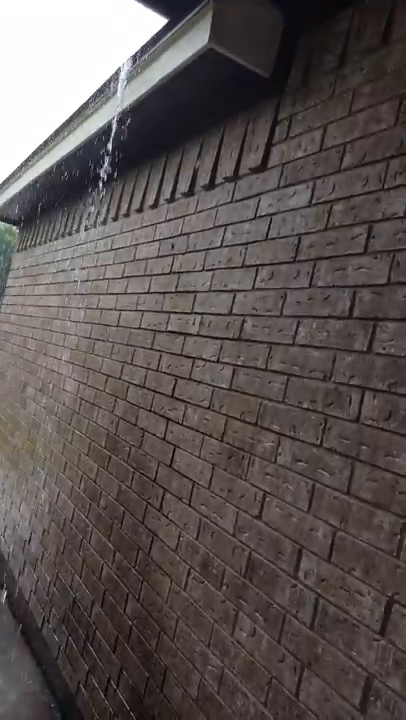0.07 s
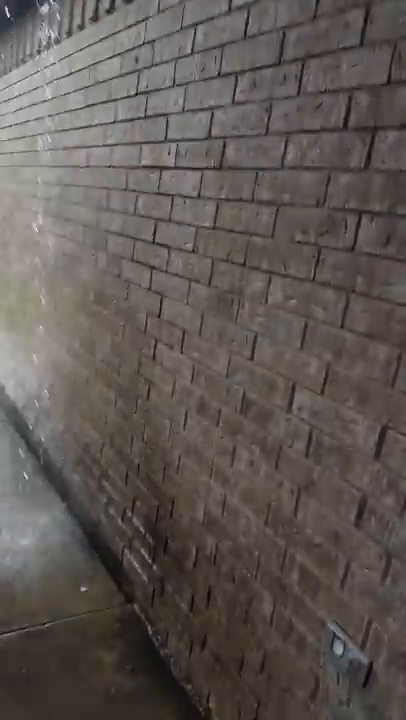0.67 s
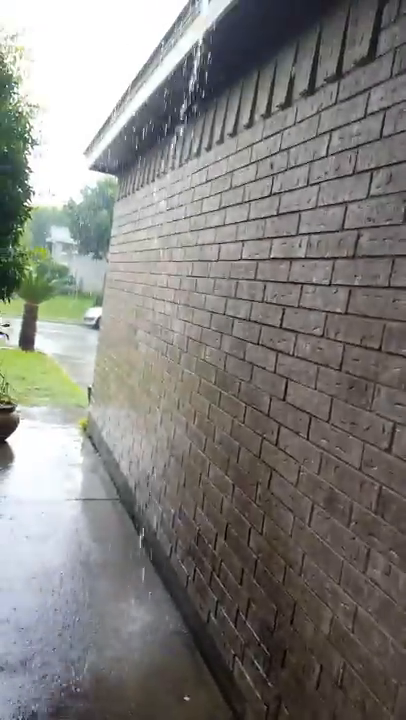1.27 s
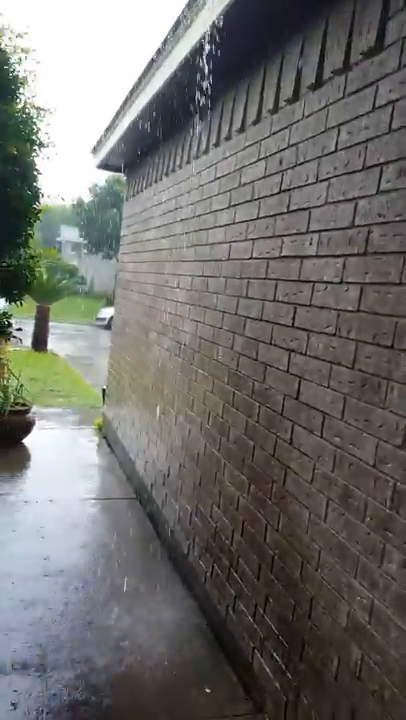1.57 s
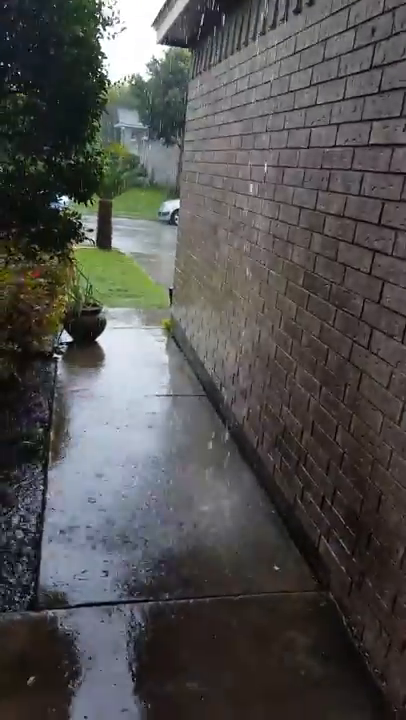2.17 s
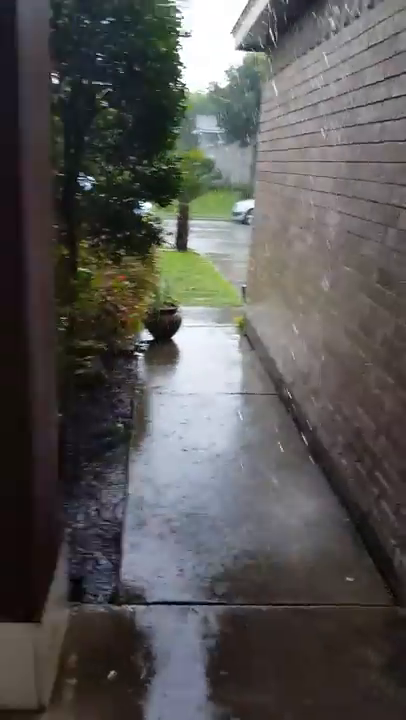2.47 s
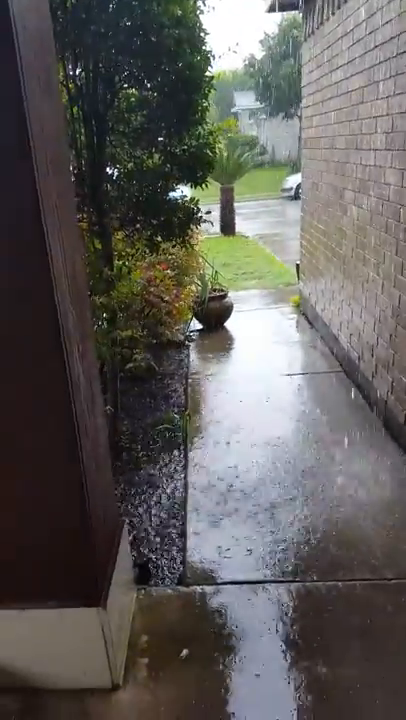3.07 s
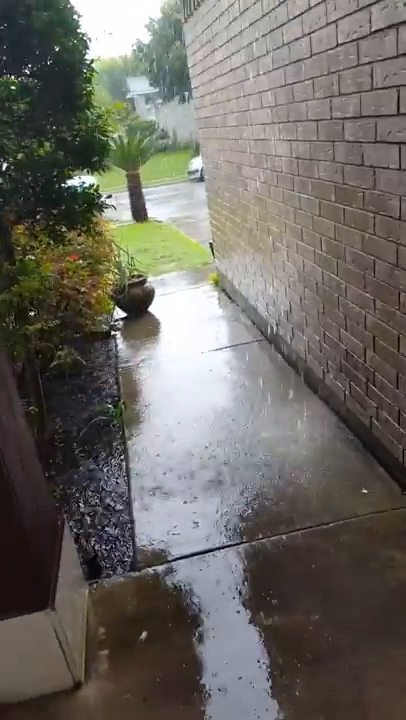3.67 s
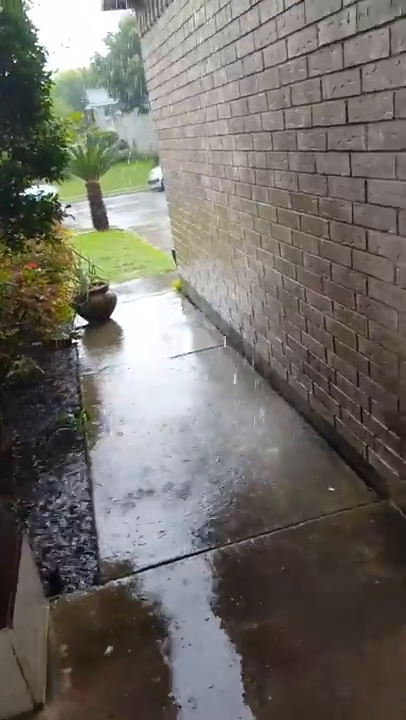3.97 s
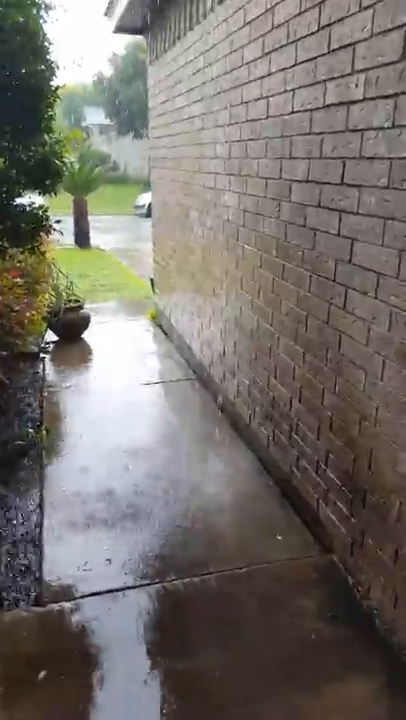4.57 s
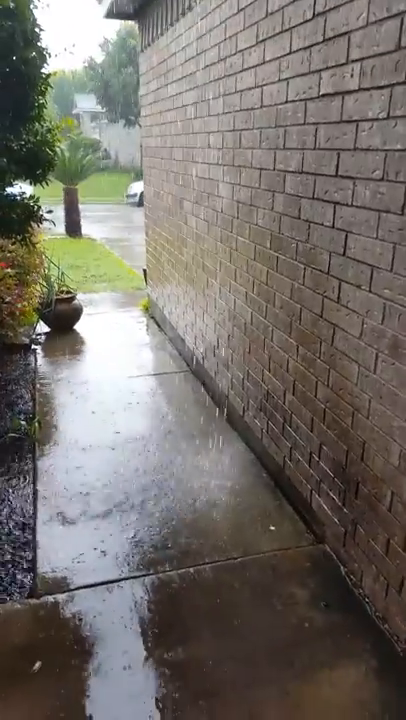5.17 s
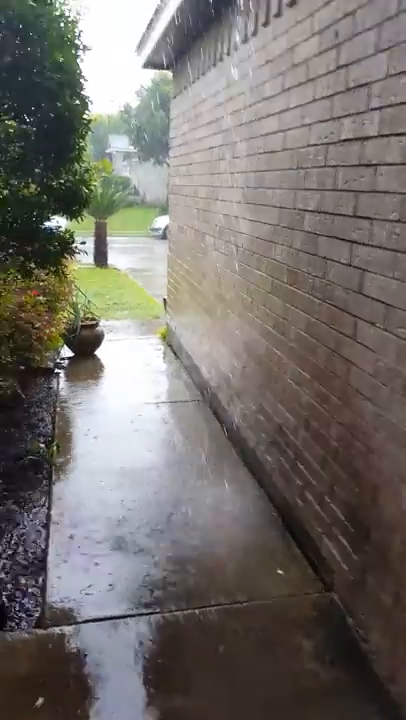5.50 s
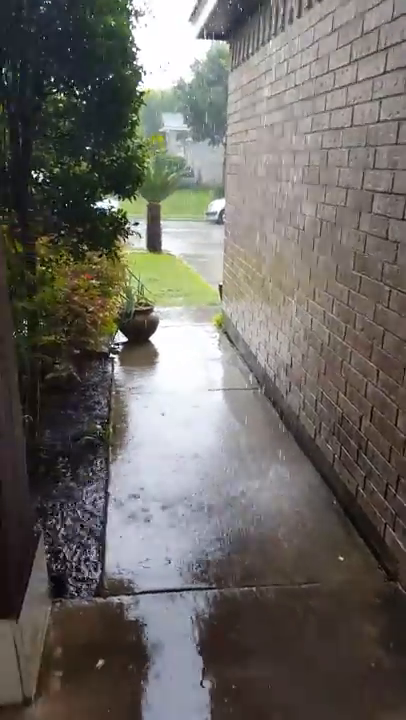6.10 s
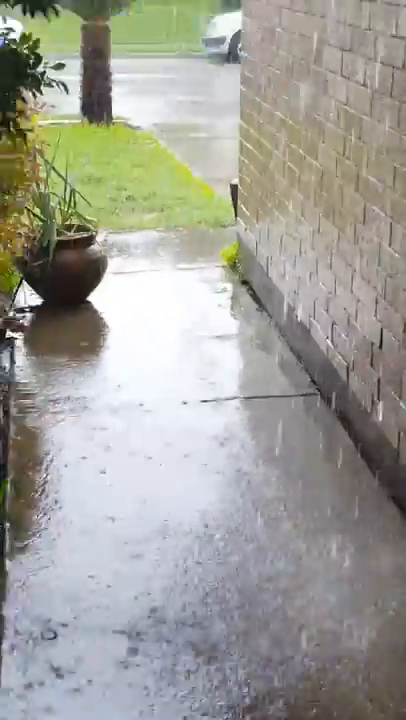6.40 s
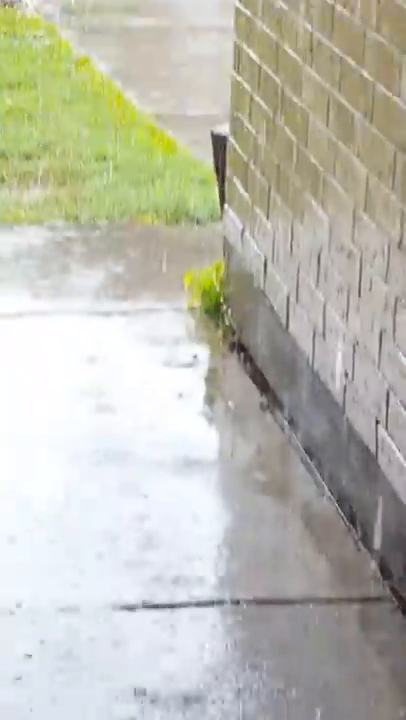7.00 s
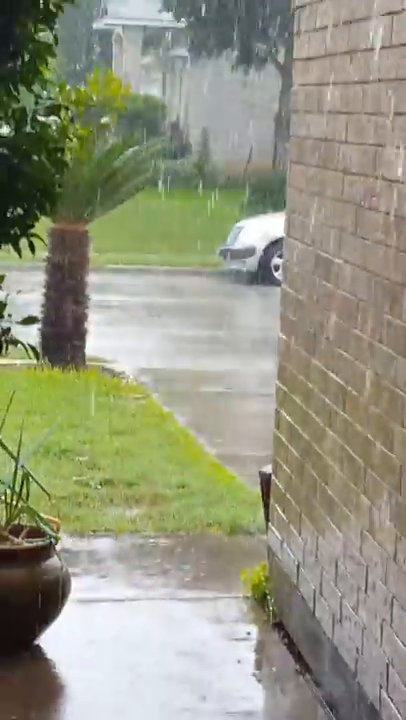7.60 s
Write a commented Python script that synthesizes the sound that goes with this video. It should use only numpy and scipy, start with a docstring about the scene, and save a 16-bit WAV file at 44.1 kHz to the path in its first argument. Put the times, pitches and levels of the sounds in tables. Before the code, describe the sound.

Water pours off a roof edge in heavy rain, slapping and splashing on wet concrete over a steady hiss.

```python
"""Water pours off a roof edge in heavy rain and slaps on wet concrete, heard from a porch.
Each gob radiates a short impact pulse, a sizzle and a splash; a brick wall and the eaves reflect them.
Small drops patter and fine spray fizzes, as shot noise. Behind them are the broadband hiss and rumble
of the rain, a few dull knocks, puffs of air and a faint hum.
Resonances and a treble notch strongly colour the right microphone port."""
import sys
import numpy as np
from scipy import signal
from scipy.fft import rfft, irfft
from scipy.io import wavfile

SR = 44100
rng = np.random.default_rng(int(sys.argv[2]) if len(sys.argv) > 2 else 0)


def bounce(signal):
    """Save signal as a 16-bit WAV file at the path given by the first command-line argument."""
    frames = np.transpose(np.atleast_2d(signal))
    limited = np.clip(frames, -1, 1)
    pcm = np.round(limited * 32767).astype(np.int16)
    wavfile.write(sys.argv[1], SR, pcm)


N = 346185

# Heavy gobs landing, levels relative: start_s, slap_db, pitch_hz, splash_db, sizzle_db
HEAVY_GOBS = [(0.035, -20, 3240, -23, -24.5), (0.113, -20, 3330, -28, -25), (0.156, -18.5, 3400, -25, -36),
              (0.195, -23, 3220, -23.5, -22), (0.236, -20, 3620, -29, -19), (0.264, -17, 3540, -29, -37),
              (0.348, -21, 3060, -24, -32), (0.448, -19, 2960, -38, -29), (0.518, -21, 2870, -30, -22),
              (0.580, -20, 3080, -21.5, -32), (0.669, -20.5, 3720, -29, -19), (0.703, -17, 2200, -36, -27),
              (0.746, -20.5, 3520, -33, -34), (0.814, -24, 2900, -27, -19), (0.877, -19.5, 2650, -32, -21),
              (0.9676, -20, 4630, -31, -21), (0.9959, -19, 2350, -28, -19), (1.0188, -15, 3860, -42, -36),
              (1.057, -15.5, 2240, -26, -31), (1.105, -20, 3400, -30, -16.5),
              (1.2142, -19.5, 3070, -32, -34), (1.254, -22, 3580, -26.5, -15.5),
              (1.307, -18, 3550, -36, -19), (1.327, -21.5, 2820, -33, -20.5),
              (1.417, -18.5, 3600, -42, -23), (1.549, -18.5, 3480, -21.5, -18.5),
              (1.615, -20.5, 2300, -28.5, -27), (1.667, -22, 3200, -33, -33),
              (1.806, -21.5, 2600, -39, -31), (1.911, -16, 3120, -35, -19), (1.9696, -18.5, 2900, -40, -19),
              (2.061, -14.5, 3270, -30, -23), (2.096, -35, 4500, -29, -17), (2.126, -20, 2400, -29, -20),
              (2.283, -24, 2980, -29, -28), (2.324, -22.5, 3070, -34, -16), (2.366, -24, 4000, -32, -18.5),
              (2.482, -22.5, 3300, -33, -22), (2.516, -20, 2750, -41, -34), (2.633, -18.5, 3980, -36, -24),
              (2.664, -18.5, 2700, -35, -38), (2.748, -26, 3000, -41, -18.5), (2.817, -19, 2400, -31, -38),
              (2.835, -25, 3500, -32, -18), (3.1873, -21, 2560, -34, -33), (3.300, -16.5, 3550, -28, -20.5),
              (3.3427, -27, 4430, -32, -16.5), (3.4136, -19, 3000, -29, -25), (3.473, -20, 2380, -39, -37),
              (3.597, -23, 2900, -33, -24), (3.6302, -19.5, 2840, -41, -31), (3.663, -18.5, 2800, -39, -36),
              (3.83, -20, 3130, -33, -30), (3.8473, -16, 3440, -33, -30), (4.010, -24, 2930, -23.5, -20),
              (4.158, -21, 3540, -26.5, -24), (4.198, -21.5, 3200, -39, -33),
              (4.3717, -17.5, 3180, -27, -19), (4.564, -21.5, 3100, -36, -19.5),
              (4.630, -20.5, 3470, -27, -35), (4.733, -36, 4540, -43, -18), (4.931, -24.5, 3700, -30, -17),
              (4.978, -20.5, 3350, -29, -35), (5.119, -19, 3180, -43, -34), (5.187, -20.5, 3300, -27, -21),
              (5.238, -21.5, 2220, -44, -38), (5.415, -20, 2920, -31, -26), (5.540, -23, 2800, -35, -27),
              (5.6231, -17.5, 2270, -31, -38), (5.815, -30, 2600, -29, -18), (5.958, -21.5, 3840, -38, -21),
              (6.054, -20.5, 2630, -38, -33), (6.179, -30, 4300, -32, -19), (6.252, -29, 2960, -26.5, -33),
              (6.373, -19, 4200, -27, -25), (6.483, -22, 2280, -36, -32), (6.592, -24, 3300, -38, -31),
              (6.9759, -22, 2970, -29, -17), (6.993, -19, 3760, -34, -29), (7.2146, -20, 3770, -30, -21.5),
              (7.345, -17.5, 4050, -25, -36), (7.630, -18, 2890, -28, -23), (7.7957, -19.5, 2200, -35, -31)]


def falling_gobs():
    """Superposition: the impacts of heavy and lesser gobs add linearly at each port."""
    out = np.zeros((2, N))
    for start_s, *gob in HEAVY_GOBS + lesser_gobs():
        for sound, place in gob_impact(*gob):
            add_with_echoes(out, start_s, sound, place)
    return out


def gob_impact(slap_db, pitch_hz, splash_db, sizzle_db, slap_cycles=4.8, size=4400):
    """Impact and break-up: a slap, a sizzle trailing mist, and drops falling back; as (sound, place)."""
    t = np.arange(size) / SR
    place = rng.standard_normal(3)
    sizzle_hz = 8200 * 2 ** (0.24 * rng.standard_normal())
    # A big, low-pitched gob takes longer to flatten.
    smack = gain_of(slap_db + 21) * slap(pitch_hz, slap_cycles / pitch_hz)
    mist = 0.17 * np.exp(-t / 0.022)
    bursting = (1 - np.exp(-t / 0.00025)) * (np.exp(-t / 0.00075) + mist)
    sizzle = band_noise(rng.standard_normal(size) * bursting, sizzle_hz, 1.57)
    falling = (1 - np.exp(-(t / 0.0042) ** 2)) * np.exp(-t / 0.023)
    splash = band_noise(shot_noise(1200, 3.1, size) * falling, pitch_hz * 1.04, 1.345)
    splash_place = rng.standard_normal(3) * [1, 3, 1]
    return [(smack, place),
            (gain_of(sizzle_db + 23) * sizzle / np.sqrt(size), place),
            (gain_of(splash_db + 28) * splash / np.sqrt(size), splash_place)]


def slap(hz, froth_s, size=700):
    """Impact radiation: flattening water emits a damped pressure pulse and throws up froth; energy 1."""
    t = np.arange(size) / SR
    age = t * hz / 1.25
    pulse = age * np.exp(-2 * age) * np.sin(2 * np.pi * (hz * t + rng.random()))
    froth_age = 1.4 * t / max(froth_s, 1e-4)
    froth = band_noise(rng.standard_normal(size), hz, 1.375) * np.sqrt(froth_age) * np.exp(-froth_age)
    return unit_rms(0.46 * unit_rms(pulse) + unit_rms(froth)) / np.sqrt(size)


# The stream from the roof, levels relative: time_s, flow_db, spray_db
STREAM = [(0.0, -25.5, -30), (1.14, -27, -30.5), (2.69, -30, -31.5), (2.97, -31, -29.5), (3.43, -28, -31),
          (4.96, -32.5, -30), (5.09, -28.5, -32), (5.79, -30.5, -32), (6.27, -32.5, -29.5),
          (6.49, -27.5, -31), (6.75, -33, -30.5), (7.17, -27.5, -32), (7.59, -31.5, -30.5),
          (7.85, -28, -34.5)]


def stream_db(t):
    """Amplitude modulation: the levels of flow and spray as the stream swells and slackens."""
    times, *levels = np.transpose(STREAM)
    return np.array([np.interp(t, times, level) for level in levels])


def lull_db(t, depth_db=-4, width_s=0.02):
    """Conservation of mass: the stream thins while a heavy gob gathers, most just before it lands."""
    landings_s = np.append(np.sort([gob[0] for gob in HEAVY_GOBS]), np.inf)
    wait_s = landings_s[np.searchsorted(landings_s, t)] - t
    return depth_db * np.exp(-(wait_s / width_s) ** 2)


def lesser_gobs(count=115, median_hz=3560, spread_octaves=0.22):
    """Jet break-up: gobs part at loosely even intervals, louder in strong flow; rows as HEAVY_GOBS."""
    start_s = (np.arange(count) + rng.random(count)) * N / SR / count
    weight, pitch, shatter = rng.standard_normal((count, 3)).clip(-2, 2).T
    flow_db, spray_db = stream_db(start_s) + lull_db(start_s)
    slap_db = flow_db + 4 + 1.4 * weight
    pitch_hz = median_hz * 2 ** (spread_octaves * pitch)
    sizzle_db = spray_db + 6 + 3.5 * shatter
    return list(zip(start_s, slap_db, pitch_hz, flow_db - 7, sizzle_db))


def patter(per_s=800, low_hz=2100, high_hz=5200, pitches=60):
    """A Poisson process: small drops land independently, their level surging with the stream."""
    t = np.arange(N) / SR
    flow_db, _ = stream_db(t) + lull_db(t)
    level_db = flow_db - 4 + 2 * drift(rate_hz=7) + 2.5 * drift(rate_hz=58)
    slaps = [slap(hz, froth_s=0.00039) for hz in np.geomspace(low_hz, high_hz, pitches)]
    strengths, places = shot_noise(per_s, 3.5, N), rng.standard_normal((N, 3))
    out = np.zeros((2, N))
    for at in np.flatnonzero(strengths):
        add_with_echoes(out, at / SR, strengths[at] * slaps[at % pitches], places[at])
    return gain_of(level_db) * unit_rms(out)


# Spectrum of fine droplets: frequency_hz, relative_density_db
SPRAY_SPECTRUM = [(500, -46), (2000, -3.5), (4000, 4), (6000, 8.5), (8000, 8), (10500, 10.5), (13000, 9.5),
                  (14500, 2.5), (16000, -14)]


def spray(per_s=7000, split_hz=8500, flurry_db=3):
    """Filtered shot noise: tiny droplets fizz on concrete, coarse and fine ones in separate flurries."""
    _, spray_db = stream_db(np.arange(N) / SR)
    level_db = spray_db + 3 + 0.9 * drift(rate_hz=8) + 1.63 * drift(rate_hz=78)
    separate, shared = shot_noise(per_s, 3, (2, N)), shot_noise(per_s, 3, N)
    fizz = colour(separate + 0.22 * shared, SPRAY_SPECTRUM)
    coarse = signal.sosfiltfilt(signal.butter(3, split_hz, fs=SR, output="sos"), fizz)
    flurries = sum(part * gain_of(flurry_db * drift(rate_hz=40)) for part in (coarse, fizz - coarse))
    return gain_of(level_db) * unit_rms(flurries)


def add_with_echoes(mix, start_s, sound, place, wall_s=0.0047, wall_db=-1.5, eaves_s=0.015, eaves_db=-12):
    """Specular reflection: wall and eaves return delayed copies, by paths that vary with landing place."""
    across, slant, depth = place
    for port, side in zip(mix, (-1, 1)):
        direct = gain_of(side * 0.52 * across) * sound
        slant_s = side * 0.0003 * (1 + slant)
        add(port, start_s + side * slant * 0.00005, direct)
        add(port, start_s + wall_s + slant_s + 0.0005 * depth, gain_of(wall_db) * direct)
        add(port, start_s + eaves_s + 0.003 * across - slant_s, gain_of(eaves_db) * direct)


# Reverberation time between wall and porch: frequency_hz, t60_s
PORCH_DECAY = [(300, 0.27), (2500, 0.22), (6000, 0.21), (14000, 0.64)]


def porch_reverb(x, first_s=0.0088, size=16384):
    """Diffuse reverberation: scattered reflections decay exponentially, slowest in the high treble."""
    reflections = shot_noise(2500, 4.1, (2, size)) * (np.arange(size) / SR > first_s)
    hz, t, spectrum = signal.stft(reflections, SR, nperseg=256)
    decay = gain_of(-60 * t / value_at(PORCH_DECAY, hz)[:, None])
    tail = signal.istft(spectrum * decay, SR, nperseg=256)[1]
    tail /= np.linalg.norm(tail, axis=1, keepdims=True)
    return signal.fftconvolve(x, tail, axes=1)[:, :N]


# Spectrum of rain on the roof and all around: frequency_hz, relative_density_db
ROOF_SPECTRUM = [(25, -31), (40, -6), (65, -1.5), (115, -0.5), (160, -2.5), (250, -3.5), (380, -7.5),
                 (550, -13), (1000, -11.5), (2500, -18), (6000, -19), (12000, -9.5), (16000, -16)]
# Spectrum of rain on the open yard and street: frequency_hz, relative_density_db
YARD_SPECTRUM = [(150, -34), (400, -3), (700, 2), (1000, -9), (1500, 1), (2500, -6), (4300, 5), (9000, -15)]
# Rain on the yard, growing toward the end: time_s, level_db
YARD_LEVEL = [(0, -46), (3.5, -36.5), (5.8, -42.5), (6.5, -35), (7.85, -34)]


def rain(roof_db=-31):
    """Incoherent summation: countless drops merge into noise, steady on the roof, swelling on the yard."""
    yard_db = np.interp(np.arange(N) / SR, *np.transpose(YARD_LEVEL))
    roof = gain_of(roof_db) * diffuse_noise(ROOF_SPECTRUM)
    return roof + gain_of(yard_db) * diffuse_noise(YARD_SPECTRUM)


# Likeness of the rain at the two ports: frequency_hz, coherence
RAIN_COHERENCE = [(100, 0.99), (250, 0.94), (500, 0.69), (1000, 0.28), (2500, 0.033), (8000, 0.083)]


def diffuse_noise(spectrum):
    """Spatial coherence: a diffuse field is alike at both ports only at long wavelengths; rms 1."""
    hz = np.fft.rfftfreq(N, 1 / SR)
    left, independent = rfft(rng.standard_normal((2, N)))
    coherence = np.clip(value_at(RAIN_COHERENCE, hz), -1, 1)
    right = coherence * left + np.sqrt(1 - coherence ** 2) * independent
    return unit_rms(irfft(np.array([left, right]) * gain_of(value_at(spectrum, hz)), N))


# Dull knocks close by: start_s, relative_level_db, scuff_db, scuff_decay_s, left_minus_right_db
KNOCKS = [(0.37, -39, -26, .004, 16), (4.991, -35.5, 4, 0.026, -6), (5.025, -33, 2, .035, -4.5),
          (6.275, -49, -12, .008, -7), (6.386, -44, -6, 0.008, -12), (6.813, -47, -15, .005, -9)]
# Spectrum of a knock: frequency_hz, relative_density_db
KNOCK_SPECTRUM = [(60, -11), (230, -1), (650, -5), (1000, -10), (1500, -1.5), (2100, -10.5), (5000, -46)]


def knocks(crack_s=0.00099, size=3000):
    """Transient excitation: a noise burst trails off in a scuff, louder at the nearer port."""
    out, t = np.zeros((2, N)), np.arange(size) / SR
    for start_s, level_db, scuff_db, scuff_s, pan_db in KNOCKS:
        envelope = np.exp(-t / crack_s) + gain_of(scuff_db) * np.exp(-t / scuff_s)
        knock = unit_rms(colour(rng.standard_normal(size) * envelope, KNOCK_SPECTRUM))
        for port, side in zip(out, (1, -1)):
            add(port, start_s, gain_of(level_db + 2 + side * pan_db / 2) * knock)
    return out


# Puffs of air on the microphone: start_s, length_s, level_db
PUFFS = [(1.4, 0.18, -40), (5.12, 0.15, -45), (5.25, 0.81, -50), (5.98, 0.23, -47)]


def air_puffs(centre_hz=75):
    """Turbulent pressure: moving air buffets each port separately with a soft, low flutter."""
    t = np.arange(N) / SR
    swell = np.zeros(N)
    for start_s, length_s, level_db in PUFFS:
        progress = np.clip((t - start_s) / length_s, 0, 1)
        swell += gain_of(level_db) * np.sin(np.pi * progress) ** 2
    return swell * band_noise(rng.standard_normal((2, N)), centre_hz, 1.9)


def hum(pitch_hz=121, level_db=-50):
    """Amplitude and phase modulation: a faint tone wavers, like that of an outdoor fan."""
    amplitude = gain_of(level_db) * (1 + 0.53 * drift(rate_hz=4.2))
    return amplitude * np.sin(2 * np.pi * pitch_hz * np.arange(N) / SR + drift(rate_hz=3.7))


def shot_noise(per_s, spread_db, size):
    """Poisson impulses of either sign, mostly small and a few large."""
    strengths = gain_of(spread_db * np.minimum(rng.exponential(1, size), 4))
    return strengths * rng.choice([-1, 1], size) * (rng.random(size) < per_s / SR)


def drift(rate_hz):
    """Low-pass noise: a random fluctuation up to about rate_hz; rms 1."""
    hz = np.fft.rfftfreq(N, 1 / SR)
    return unit_rms(irfft(rfft(rng.standard_normal(N)) / (1 + (hz / rate_hz) ** 4), N))


def band_noise(noise, hz, ratio):
    """Broad resonance: passes noise from hz / ratio to hz * ratio; rms 1."""
    edges_hz = [hz / ratio, min(hz * ratio, SR / 2.2)]
    return unit_rms(signal.lfilter(*signal.butter(2, edges_hz, "bandpass", fs=SR), noise))


def colour(x, spectrum, size=2048):
    """Minimum-phase filtering: the phase follows from the log gain by the Hilbert transform."""
    hz = abs(np.fft.fftfreq(size, 1 / SR))
    log_gain = np.log(gain_of(value_at(spectrum, hz)))
    response = np.exp(np.conj(signal.hilbert(log_gain)))
    taps = np.fft.ifft(response).real[:size // 2]
    return signal.oaconvolve(x, np.array(taps, ndmin=x.ndim), axes=-1)[..., :x.shape[-1]]


def value_at(table, hz):
    """Interpolation on a log-frequency axis."""
    table_hz, values = np.transpose(table)
    return np.interp(np.log(hz + 1), np.log(table_hz + 1), values)


def add(channel, start_s, sound):
    """Superposition of a sound on one channel, in place."""
    part = channel[max(round(start_s * SR), 0):][:len(sound)]
    part += sound[:len(part)]


def gain_of(db):
    """Decibels as an amplitude ratio."""
    return 10 ** (np.asarray(db) / 20)


def unit_rms(x):
    """Normalisation to rms 1."""
    return x / np.sqrt(np.mean(x ** 2) + 1e-20)


def scene(reverb_db=-8):
    """Superposition of the runoff, its reverberation and the background."""
    runoff = falling_gobs() + patter() + spray()
    return runoff + gain_of(reverb_db) * porch_reverb(runoff) + rain() + hum() + knocks() + air_puffs()


# Response of the right port against the left: frequency_hz, gain_db
RIGHT_PORT = [(750, 0.67), (1350, 5), (1900, 6), (2400, 10.5), (2800, 9.5), (3200, -0.5), (3600, 5.5),
              (4800, -3), (6000, 2), (7500, -7.3), (8100, -5.5), (9200, -20), (10400, -12.5), (11900, -6.5),
              (13500, -3)]
# Its resonances as the microphone is held and turned: time_s, body_gain_db, ring_gain_db
GRIP = [(0, -8, -0.5), (0.6, -4, -4.5), (0.8, -2.5, 2), (5.6, -2, 3), (6.2, 0.5, -2.5), (7.85, -0.5, -5.5)]


def record(dry, body_hz=1150, ring_hz=2550, cutoff_hz=15950):
    """Port resonance colours the right channel; both channels are then clipped and band-limited."""
    t = np.arange(N) / SR
    right = colour(dry[1], RIGHT_PORT)
    times, body_db, ring_db = np.transpose(GRIP)
    for hz, q, shift_db in ((body_hz, 1.2, body_db), (ring_hz, 4.5, ring_db)):
        resonance = signal.lfilter(*signal.iirpeak(hz, q, fs=SR), right)
        right = right + resonance * (gain_of(np.interp(t, times, shift_db)) - 1)
    lowpass = signal.firwin(511, cutoff_hz, window=("kaiser", 9), fs=SR)
    return signal.oaconvolve(np.clip([dry[0], right], -1, 1), lowpass[None], "same", axes=1)


dry = scene()
out = record(dry)
bounce(out)
```